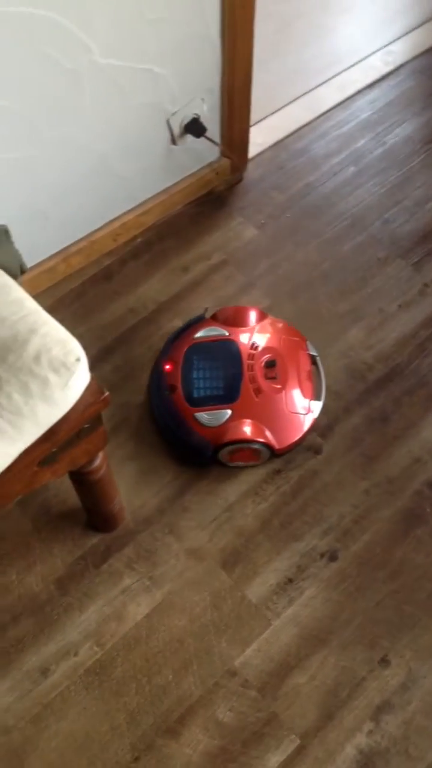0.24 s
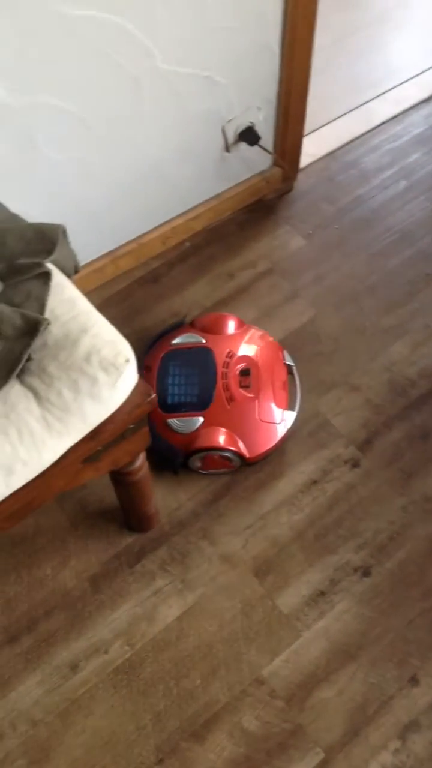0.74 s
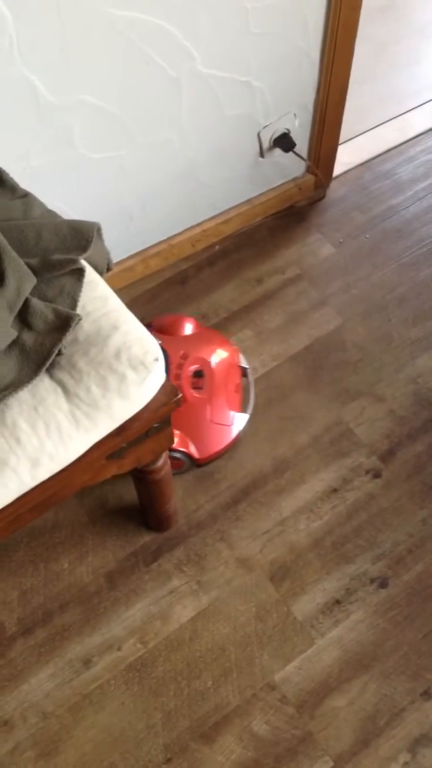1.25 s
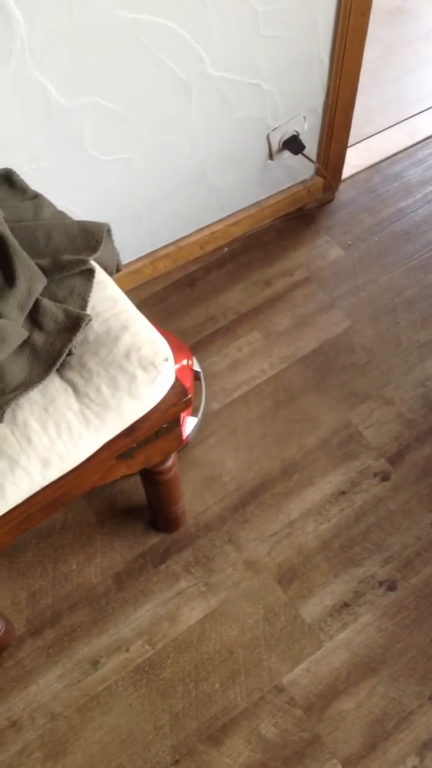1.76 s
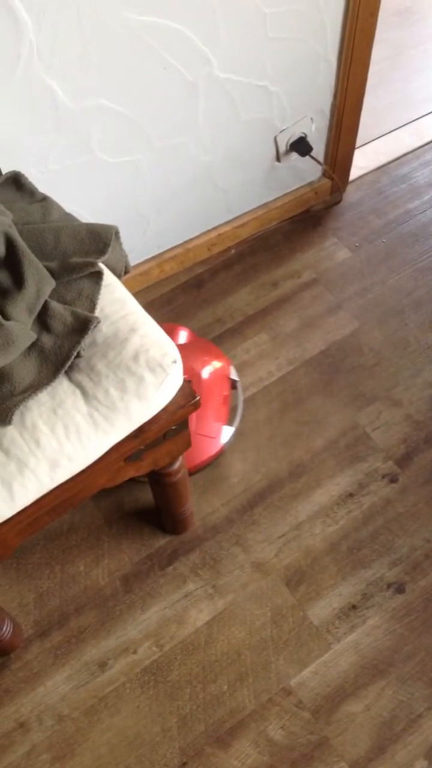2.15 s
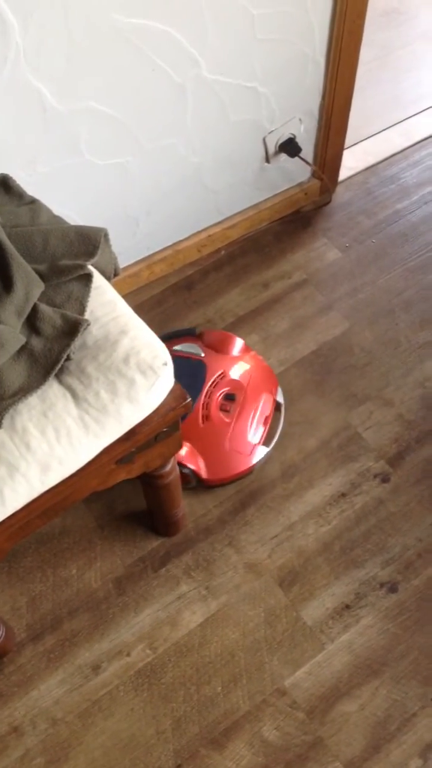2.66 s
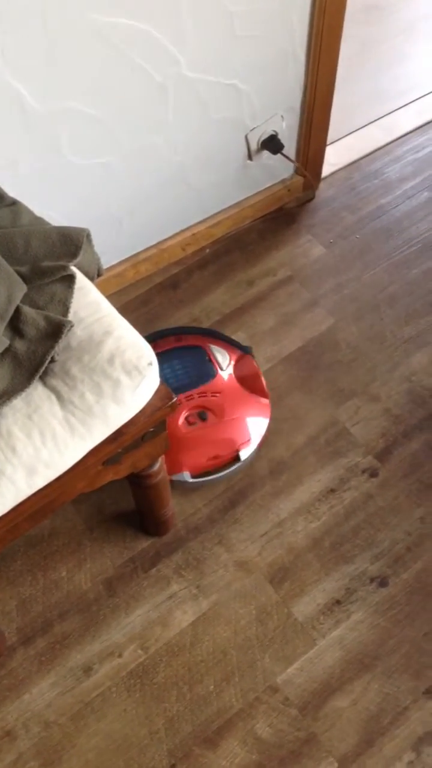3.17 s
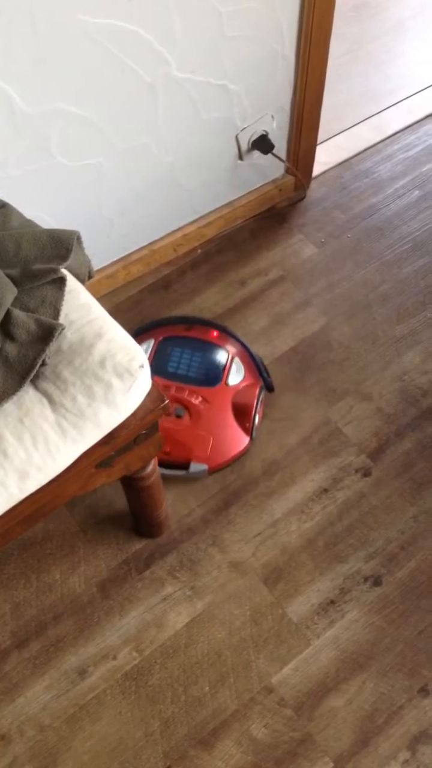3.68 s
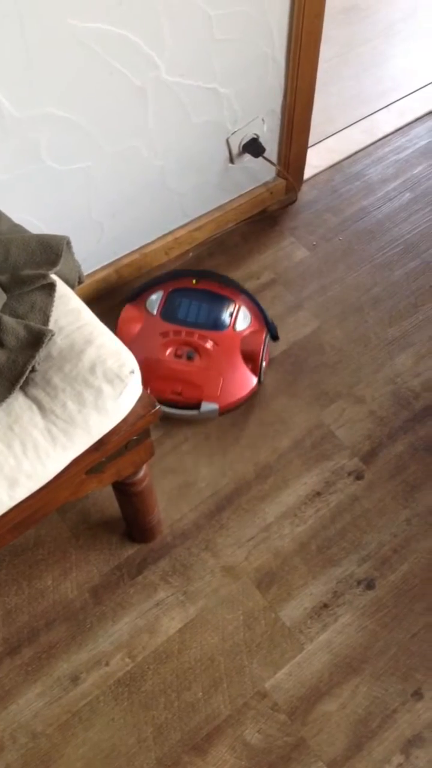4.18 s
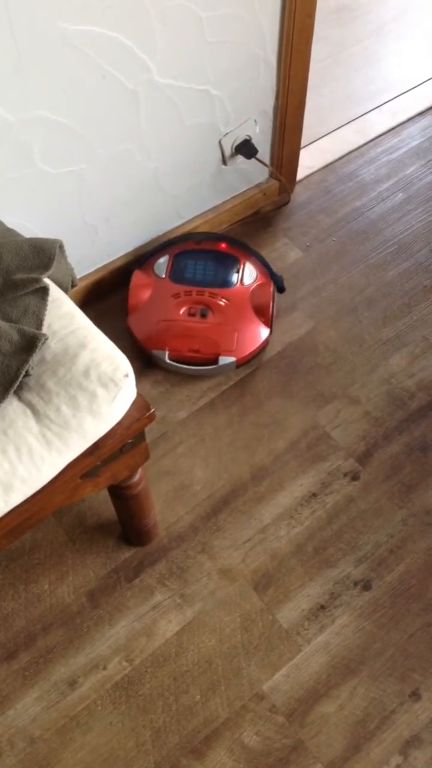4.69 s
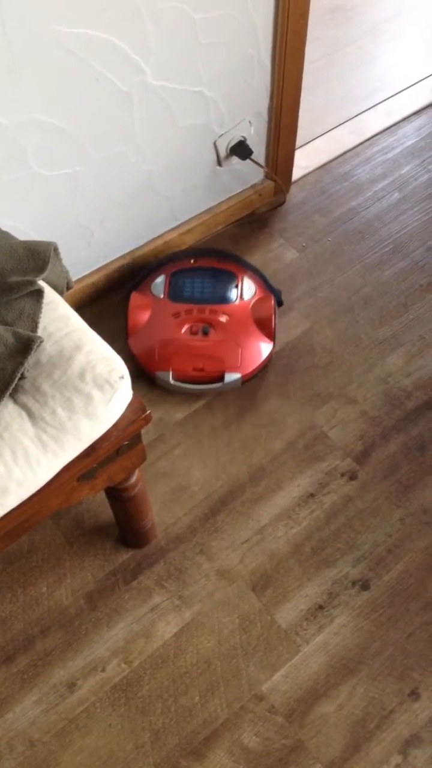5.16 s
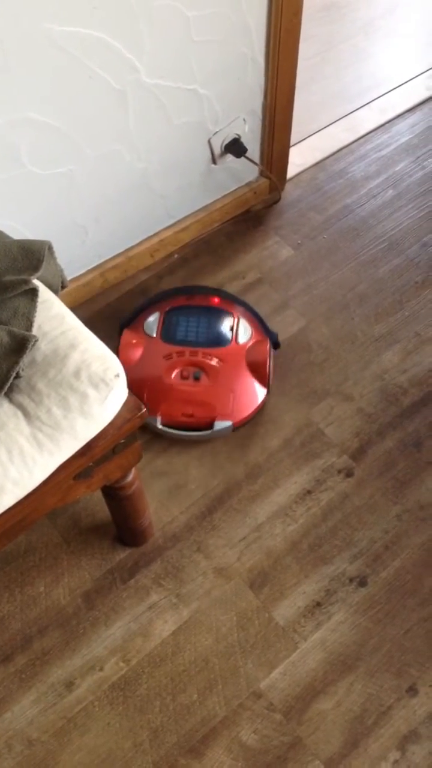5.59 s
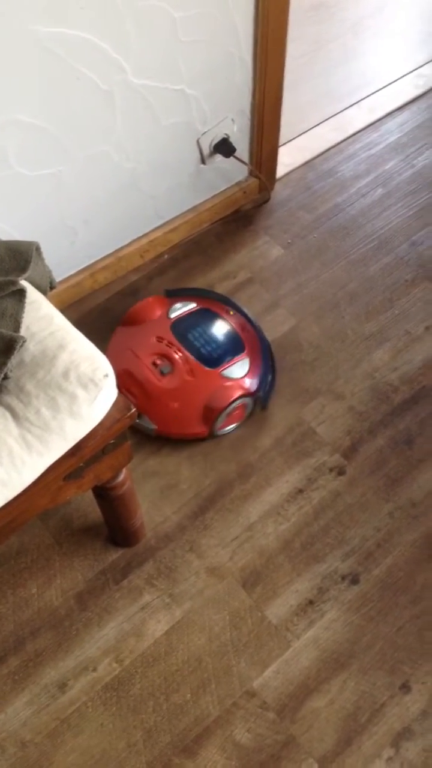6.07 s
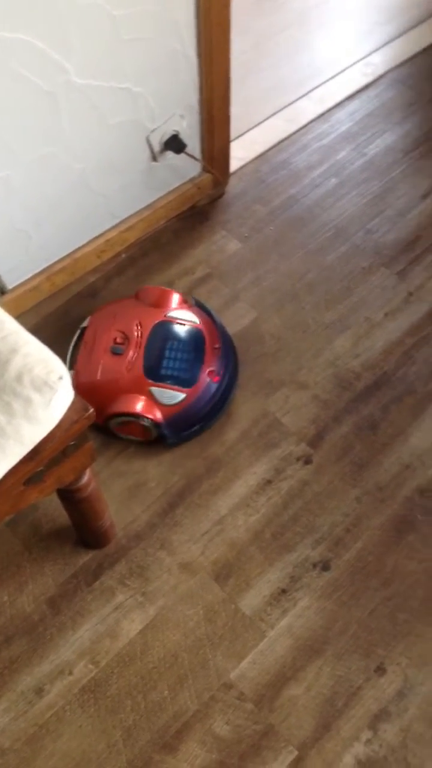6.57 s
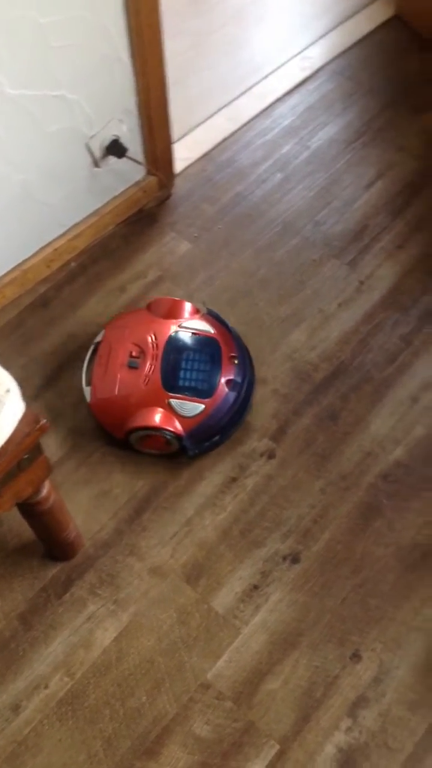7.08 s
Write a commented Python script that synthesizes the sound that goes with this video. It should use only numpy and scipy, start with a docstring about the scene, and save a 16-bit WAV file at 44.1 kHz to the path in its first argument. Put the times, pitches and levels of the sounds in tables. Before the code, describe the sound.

A steady fan whine, airy hiss and low motor rumble come from a robot vacuum crossing a room's wooden floor, heard from a few steps away. The tones gently swell and fade as it moves. A soft bump and brief shudder come early, then two faint knocks while the sound is slightly muffled by a sofa. Near the end the drive labours, the brushes swish briefly and another soft bump follows.

```python
"""A small robot vacuum crosses a wooden floor, a few steps away. From the start its fan whines on harmonics
of the shaft speed, each swelling and fading in the room's standing waves; turbulent air rushes and the
drive rumbles in the plastic shell. Near 2 s it knocks softly and shudders under the corner of a sofa,
which dulls the treble on and off until 4 s. At 5 s a wall's reflection lifts the rush. After 6 s the
robot turns: the drive labours, brushes swish over the boards and the chassis knocks once more."""
import sys
import numpy as np
from scipy import signal
from scipy.fft import rfft, irfft
from scipy.io import wavfile
from scipy.ndimage import map_coordinates

SR = 44100
rng = np.random.default_rng(int(sys.argv[2]) if len(sys.argv) > 2 else 0)


def store_wav(level_fs):
    """Save 16-bit WAV to argv[1]."""
    pcm = np.round(np.clip(np.atleast_2d(level_fs), -1, 1) * 32767)
    wavfile.write(sys.argv[1], SR, pcm.T.astype(np.int16))


N = 323694
TIME = np.arange(N) / SR
SLOW = np.linspace(0, N / SR, 1500)  # clock of the slowly changing gains, in s
FREQ = np.maximum(np.arange(N // 2 + 1) * SR / N, 1)


def undb(db):
    """Decibels to amplitude ratio."""
    return 10 ** (np.asarray(db) / 20)


def unit(x):
    """Normalisation to rms 1."""
    return x / np.sqrt(np.mean(np.abs(x) ** 2))


def noise():
    """Gaussian white noise."""
    return rng.standard_normal(N)


def colour(x, points):
    """Spectral shaping by (frequency_hz, level_db) points; rms 1."""
    hz, db = np.transpose(points)
    skirt = 1 / (1 + (hz[0] / FREQ) ** 4)
    shape = undb(np.interp(np.log(FREQ), np.log(hz), db))
    return unit(irfft(rfft(x) * skirt * shape, N))


def ring(x, modes):
    """Forced resonance of (centre_hz, width_hz, level_db) modes; rms 1."""
    body = sum(undb(db) / (1 + ((FREQ / hz - hz / FREQ) * hz / width) ** 2) for hz, width, db in modes)
    return unit(irfft(rfft(x) * body, N))


def walk(rate_hz):
    """Low-pass noise: smooth random motion of rms 1."""
    lowpass = np.exp(-.5 * (np.arange(len(FREQ)) * SR / N / rate_hz) ** 2)
    return unit(irfft(rfft(noise()) * lowpass, N))


def bell(s, length):
    """Gaussian envelope around time s."""
    return np.exp(-2 * ((TIME - s) / length) ** 2)


def plateau(s, length, steep=2.6, clock=TIME):
    """Flat-topped envelope around time s; length is the width at half height."""
    return 1 / (1 + np.abs(2 * (clock - s) / length) ** steep)


def fading(rate_hz, echo):
    """Multipath interference: direct sound plus changing echoes, as a slow complex gain of rms 1."""
    swing_hz = np.fft.fftfreq(len(SLOW), SLOW[1])
    paths = rng.standard_normal(len(SLOW)) + 1j * rng.standard_normal(len(SLOW))
    echoes = unit(np.fft.ifft(paths * np.exp(-.5 * (swing_hz / rate_hz) ** 2)))
    return unit(1 + echo * echoes) * np.exp(2j * np.pi * rng.random())


def tone(gain, phase):
    """Modulation: a slow complex gain sets a sine's rms level and phase offset."""
    return np.sqrt(2) * np.real(np.interp(TIME, SLOW, gain) * np.exp(1j * phase))


# changes of fan speed: middle_s, change_hz, length_s
FAN_LOADS = [(0.197, 0.35, 0.75), (2.046, -1.66, .22), (2.45, 1.2, .24), (3.726, -1.68, .28),
             (4.461, 1.0, 0.68), (5.109, -3, .44), (5.761, -1.58, 0.29), (6.833, -1.9, 0.35)]

def shaft_angle(fan_hz=255.2, wobble_hz=0.11):
    """Motor loading: the fan slows as the wheels draw current and picks up as they ease; in radians."""
    hz = fan_hz + sum(change * plateau(s, length, steep=3.5) for s, change, length in FAN_LOADS)
    return 2 * np.pi * np.cumsum(hz + wobble_hz * walk(15.8)) / SR


# crossings of antinodes and nodes: middle_s, harmonic, level_db, length_s
WAVE_CROSSINGS = [(.3, 1, -66, 0.94), (1.774, 1, -38.5, 0.54), (.08, 3, -41.5, 0.26), (1.82, 3, -42, 0.23),
                  (2.136, 3, -32.5, 0.29), (2.64, 3, -33, 0.084), (3.867, 3, -30, 0.36),
                  (4.17, 3, -33, 0.33), (4.632, 3, -44, 0.35), (5.168, 3, -27, 0.43), (5.712, 3, -30, 0.67),
                  (6.4, 3, -43, 0.36), (7.17, 3, -30, 0.65), (.05, 4, -52, 0.33), (1.22, 4, -35.5, 0.97),
                  (2.8, 4, -38.5, 1.25), (4.0, 4, -54, .8), (5.4, 4, -53, .6), (6.202, 4, -36.5, 0.71),
                  (7.28, 4, -37, .2), (.4, 5, -45.5, 0.81), (2.02, 5, -39, 0.13), (3, 5, -38.5, 0.64),
                  (4.25, 5, -38, 0.96), (5.4, 5, -58, 0.27), (6.25, 5, -35, 0.77), (.2, 6, -33, 0.5),
                  (1.95, 6, -31.5, 1.85), (2.073, 6, -28.5, 0.13), (3.15, 6, -37, 0.38),
                  (3.55, 6, -32, 0.33), (3.8, 6, -43, 0.14), (4.05, 6, -32, 0.28), (4.5, 6, -38, 0.61),
                  (5.38, 6, -51, 0.25), (6.17, 6, -28, 0.69), (6.09, 6, -25.5, 0.35), (.03, 7, -44, 0.25),
                  (1.08, 7, -29.5, 1.78), (2.103, 7, -33, .14), (2.297, 7, -28, 0.067),
                  (2.342, 7, -52, 0.11), (2.465, 7, -32.5, 0.15), (2.78, 7, -30.5, 0.28),
                  (3.16, 7, -52, 0.3), (3.934, 7, -32, .32), (4.6, 7, -41.5, 0.96), (5.145, 7, -25.5, 0.2),
                  (5.426, 7, -33, 0.41), (6.05, 7, -31, 0.58), (6.58, 7, -50, 0.21), (7.24, 7, -35, 0.23),
                  (0.703, 8, -39, 0.47), (1.8, 8, -42.5, 0.39), (2.68, 8, -36.5, .16), (3.25, 8, -36, 0.48),
                  (4, 8, -44, 0.28), (4.67, 8, -37.5, 0.46), (5.3, 8, -42, 0.11), (5.7, 8, -38, 0.33),
                  (6.15, 8, -49, .25), (6.7, 8, -36.5, 0.12), (.1, 9, -42.5, 0.4), (2.45, 9, -45, 0.86),
                  (4.05, 9, -38.5, 0.3), (5.455, 9, -43, 0.34), (6.1, 9, -39.5, .2), (6.6, 9, -51, .2),
                  (.4, 10, -35, .4), (1.85, 10, -52, 0.6), (3.403, 10, -38.5, 0.33), (3.746, 10, -37, 0.34),
                  (4.05, 10, -57, 0.19), (4.6, 10, -40, .3), (5.1, 10, -39, 0.15), (6.15, 10, -40.5, .3),
                  (7.1, 10, -36.5, 0.5), (.1, 12, -42, 0.14), (0.71, 12, -38.5, 0.55), (1.5, 12, -44, 0.26),
                  (2.15, 12, -40.5, .2), (2.8, 12, -41.5, 0.22), (3.453, 12, -42, 0.3),
                  (4.16, 12, -38.5, 0.22), (4.853, 12, -37, 0.41), (.5, 13, -39.5, 0.21),
                  (1.953, 13, -44, 0.27), (4.966, 13, -39.5, 0.57), (.15, 14, -52, 0.27),
                  (2.3, 14, -46.5, 0.17), (6.352, 14, -40.5, 0.58), (7.1, 14, -47, 0.28),
                  (.8, 15, -51, 0.13), (3.1, 15, -43.5, 0.23), (7.253, 15, -42, 0.18), (5.25, 15, -44, .2),
                  (6.7, 15, -41, .2), (1.39, 16, -40.5, 0.24), (6.95, 16, -42, .35),
                  (3.45, 17, -39.5, 0.29), (6.082, 17, -36.5, 0.19), (2.08, 18, -40.5, .5),
                  (5.95, 18, -40, 0.19), (1.4, 19, -48, 0.22), (3.29, 19, -38.5, 0.13),
                  (5.95, 19, -42, 0.27), (6.8, 19, -42, 0.32), (.15, 20, -43, 0.33), (1.422, 20, -42, 0.39),
                  (2.28, 20, -37, 0.14), (3.5, 20, -43, 0.28), (4.5, 20, -41, 0.5), (7.1, 20, -47, .3)]

def standing_waves(gain, k, steep):
    """Standing waves: harmonic k swells at an antinode and sinks at a node, with no jump of phase."""
    for s, harmonic, db, length in WAVE_CROSSINGS:
        if round(harmonic) == k:
            target = undb(db) * np.exp(1j * np.angle(np.interp(s, SLOW, gain)))
            gain = gain + plateau(s, length, steep, SLOW) * (target - gain)
    return gain


# fan tones between crossings, the first being the hum of imbalance: harmonic, level_db
FAN_HARMONICS = [(1, -44), (3, -39), (4, -43), (5, -43), (6, -36.5), (7, -37), (8, -46.5), (9, -46),
                 (10, -43), (11, -53.5), (12, -43.5), (13, -47), (14, -46), (15, -50), (16, -49.5),
                 (17, -46.5), (18, -47), (19, -46.5), (20, -48.5), (21, -54), (24, -52.5), (28, -54),
                 (30, -50.5)]
TONE_SHADE = 0.52  # share of the sofa's loss in dB that the higher tones suffer

def whine(angle, direct_up_to=7, drift_rad=1.41):
    """Harmonics of rotation: the low ones arrive mostly direct, the high ones waver with the echoes."""
    out = 0
    shade = undb(-TONE_SHADE * np.interp(SLOW, TIME, sofa_shade()))
    for harmonic, db in FAN_HARMONICS:
        k = round(harmonic)
        if k <= direct_up_to:
            gain = undb(db) * fading(rate_hz=2.4, echo=0.19)
            gain = standing_waves(gain, k, steep=6.7) * fading(rate_hz=15, echo=0.16)
            # changing path lengths slowly turn the phase
            gain = gain * np.exp(1j * drift_rad * np.interp(SLOW, TIME, walk(0.35)))
        else:
            gain = undb(db) * shade * fading(rate_hz=2.6, echo=0.65)
            gain = standing_waves(gain, k, steep=3.3) * fading(rate_hz=14, echo=0.48)
        out = out + tone(gain, k * angle)
    return out


def buzz(angle, level_db=-54.5, octave_db=-7.5, lowest=22, count=38):
    """Harmonic series: a comb of high shaft multiples, weakening with frequency, shaded by the sofa."""
    comb = 0
    for k in range(lowest, lowest + count):
        gain = undb(level_db + octave_db * np.log2(k / lowest)) * fading(rate_hz=2.4, echo=1)
        comb = comb + tone(gain, k * angle)
    return comb * undb(-TONE_SHADE * sofa_shade())


def mottle(x, depth_db=1.7, patch_hz=80, patch_s=0.3007, size=1024):
    """Interference: moving reflections briefly lift and sink narrow patches of a noise spectrum."""
    hz, s, cells = signal.stft(x, SR, nperseg=size)
    places = np.meshgrid(hz / patch_hz, s / patch_s, indexing="ij")
    ripple = map_coordinates(rng.standard_normal((size, size)), places, order=1, mode="mirror")
    return signal.istft(cells * undb(depth_db * ripple), SR, nperseg=size)[1][:N]


# air through the nozzle and fan housing: frequency_hz, relative_db
RUSH_SPECTRUM = [(200, -54), (480, -6.5), (730, -5), (900, -2), (1150, -2), (1320, -2.5), (1490, -2.5),
                 (1700, -2.5), (2200, -10), (2550, -11.5), (2780, -8.5), (3150, -4), (3800, -16.5),
                 (4200, -10), (4700, -8.5), (5400, -17), (9000, -34)]
# resonances of the duct and dust bin: centre_hz, width_hz, relative_db
DUCT_MODES = [(897, 30, 2), (973, 22, -4), (1049, 24, -3), (1121, 20, 3), (1196, 32, 2.5), (1450, 58, .5),
              (1492, 26, 0.5), (2127, 60, -10.5), (2425, 54, -8.5), (2640, 85, -7.5), (3180, 48, -6)]
# exhaust and bristle hiss: frequency_hz, relative_db
HISS_SPECTRUM = [(1000, 2), (3000, -0.5), (4700, -3), (5300, -6.5), (5850, -5), (6600, -1), (7500, -1),
                 (9000, -5), (10500, -8.5), (12500, -8.5), (14000, -12), (15300, -21)]

def airflow(angle, rush_db=-32.5, duct_db=-40, hiss_db=-34, flutter_db=0.94, rush_shade=0.3, chop=0.062):
    """Turbulence: broadband noise rushes, rings the duct and hisses, lightly chopped once per fan turn."""
    shade_db = sofa_shade()
    wall_db = 1.5 * plateau(s=5, length=0.41)  # reflection from the wall
    flow = colour(noise(), RUSH_SPECTRUM) * undb(rush_db)
    duct = ring(noise(), DUCT_MODES) * undb(duct_db)
    rush = (flow + duct) * undb(wall_db - rush_shade * shade_db + flutter_db * walk(22))
    hiss = colour(noise(), HISS_SPECTRUM) * undb(hiss_db - shade_db + 0.5 * walk(30))
    return mottle(rush + hiss) * (1 + chop * np.cos(angle))


# breathy bands of the air slots: middle_s, level_db, length_s, centre_hz, width_hz
SLOT_BANDS = [(.15, -43, 0.42, 2400, 220), (.88, -44, 0.17, 2270, 150), (.9, -47, 0.38, 3230, 263),
              (1.75, -54, .5, 3300, 180), (3.2, -47, 0.53, 3200, 170), (3.3, -49, 0.4, 2250, 100),
              (3.25, -47, 0.33, 4570, 260), (4.17, -42, 0.12, 3170, 220), (4.25, -45, .3, 2220, 180),
              (4.85, -41, 0.5, 3130, 620), (5.344, -42, .5, 1160, 160), (5.427, -50, .35, 3400, 302),
              (6.15, -42, 0.66, 4300, 520), (6.6, -46.5, 0.6, 3900, 400)]

def grille(flutter_db=1.5, grain_db=1.5):
    """Directivity: each resonance of the air slots is heard as it turns toward the listener."""
    bands = sum(ring(noise(), [(hz, width, 0)]) * undb(db) * bell(s, length)
                for s, db, length, hz, width in SLOT_BANDS)
    return bands * undb(flutter_db * walk(7.4) + grain_db * walk(97))


# resonances of the shell and floor: centre_hz, width_hz, relative_db
SHELL_MODES = [(180, 22, -36), (224.8, 18, -5.5), (270.8, 36, 1), (307, 43, -1), (351, 11, -0.5)]
# resonances of the hollow interior: centre_hz, width_hz, relative_db
CAVITY_MODES = [(395.2, 34.6, 0.5), (525.6, 20, -7.5)]
# resonances of the boards under the wheels: centre_hz, width_hz, relative_db
BOARD_MODES = [(118, 12, -12), (152, 14, -1), (181.5, 24, 5)]
# glides, stops, reversals and turns: middle_s, length_s, shell_rise_db, board_rise_db
MANOEUVRES = [(.25, 0.48, -3, 2), (1.92, 1, 4, 5.5), (2.64, .36, 0, 9.5), (4.617, 0.51, 6.5, 3),
              (5.1, 0.42, 5, 4), (6.27, 0.47, 3, 7)]

def drive(shell_db=-42, cavity_db=-42.5, board_db=-63, cavity_share=0.21, throb_db=1.5, throb_hz=15.2):
    """Forced vibration: gears shake shell and cavity, throbbing with the brushes; wheels shake boards."""
    labour_db = sum(db * plateau(s, length) for s, length, db, _ in MANOEUVRES)
    scrub_db = sum(db * plateau(s, length) for s, length, _, db in MANOEUVRES)
    throb_phase = 2 * np.pi * np.cumsum(throb_hz + .5 * walk(4.2)) / SR
    throb = undb(throb_db * np.sin(throb_phase))
    shell = ring(noise() * throb, SHELL_MODES) * undb(shell_db + labour_db)
    cavity = ring(noise() * throb, CAVITY_MODES) * undb(cavity_db + cavity_share * labour_db)
    boards = ring(noise(), BOARD_MODES) * undb(board_db + scrub_db)
    return shell + cavity + boards


# passages under the sofa's corner: middle_s, hiss_loss_db, length_s
SOFA_PASSAGES = [(1.88, 4, 0.92), (3.25, 1.6, 1.5), (3.744, 1.8, 0.16)]

def sofa_shade():
    """Acoustic shadow: the treble lost under the sofa, in dB."""
    return sum(db * plateau(s, length, steep=4.3) for s, db, length in SOFA_PASSAGES)


# blows to the chassis: start_s, level_db, pitch_hz, t60_s
CHASSIS_BLOWS = [(1.66, -23, 400, 0.11), (2.585, -33, 670, 0.23), (3.737, -32, 288, 0.12),
                 (6.635, -22.5, 957, 0.12)]
# modes of the struck part: pitch_ratio, relative_db
PART_MODES = [(.86, -21.5), (0.951, -1.5), (1.02, 5), (1.13, -22), (1.31, -20)]

def knocks(attack_s=0.017, rattle_db=-2.0, rattle_width=0.6):
    """Damped free vibration: each soft blow excites close modes and a rattle that decay exponentially."""
    out = 0
    for s, db, hz, t60 in CHASSIS_BLOWS:
        age = np.maximum(TIME - s, 0)
        modes = sum(undb(mode_db) * np.sin(2 * np.pi * ratio * hz * age + rng.uniform(0, 2 * np.pi))
                    for ratio, mode_db in PART_MODES)
        rattle = undb(rattle_db) * ring(noise(), [(hz, rattle_width * hz, 0)])
        onset = 1 - np.exp(-(age / attack_s) ** 2)  # soft contact, no click
        decay = np.exp(-np.log(1000) * age / t60)
        out = out + (modes + rattle) * undb(db) * onset * decay
    return out


# shaking of floor and chassis: frequency_hz, relative_db
SHUDDER_SPECTRUM = [(40, -16), (115, -5), (180, -4), (260, 5), (480, -17), (800, 1), (1600, -25),
                    (4000, -50)]

def shudder(middle_s=1.825, length_s=0.11, level_db=-36):
    """Structure-borne noise: a short diffuse rumble as the wheels stall against an obstacle."""
    return colour(noise(), SHUDDER_SPECTRUM) * undb(level_db) * plateau(middle_s, length_s, steep=6.9)


# brush strokes during the turn: middle_s, relative_db, length_s
BRUSH_STROKES = [(6.119, -38, .05), (6.17, -45, .05), (6.252, -37, 0.044), (6.406, -38, .04),
                 (6.462, -38, .04), (6.50, -45, .035), (6.54, -36.5, 0.041), (6.637, -37, 0.032)]
# bristles on wood: frequency_hz, relative_db
BRISTLE_SPECTRUM = [(3000, 4), (7800, -2), (10000, -6), (11700, 3), (13000, -13), (15400, -13)]

def brushes(grain_db=3, gain_db=1):
    """Friction noise: many tiny bristle ticks merge into short swishes."""
    strokes = sum(undb(db) * bell(s, length) for s, db, length in BRUSH_STROKES)
    ticks = noise() * undb(grain_db * walk(400))
    return colour(ticks, BRISTLE_SPECTRUM) * strokes * undb(gain_db)


def scene():
    """Superposition: the parts add up to one small source straight ahead, alike in both channels."""
    angle = shaft_angle()
    fan = whine(angle) + buzz(angle) + airflow(angle) + grille()
    robot = fan + drive() + shudder() + knocks() + brushes()
    return np.array([robot, robot])


def record(dry, low_cut_hz=115, high_cut_hz=15300):
    """Band limiting: a high-pass thins the bass and a steep low-pass cuts the top."""
    highpass = signal.butter(3, low_cut_hz, "highpass", fs=SR, output="sos")
    lowpass = signal.ellip(12, .1, 80, high_cut_hz, fs=SR, output="sos")
    return signal.sosfilt(lowpass, signal.sosfilt(highpass, dry))


dry = scene()
out = record(dry)
store_wav(out)
```